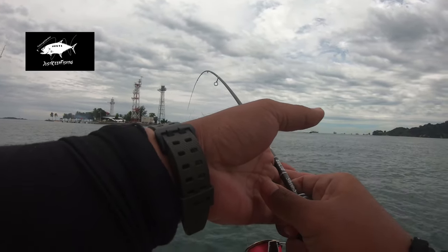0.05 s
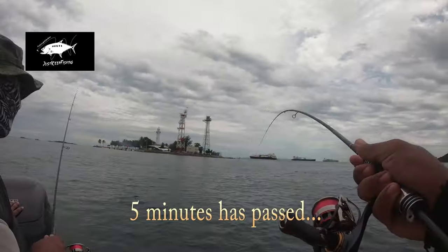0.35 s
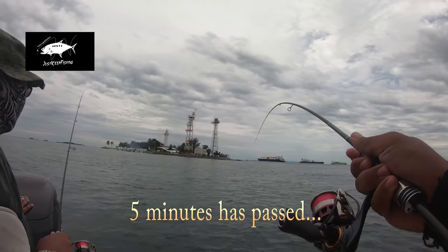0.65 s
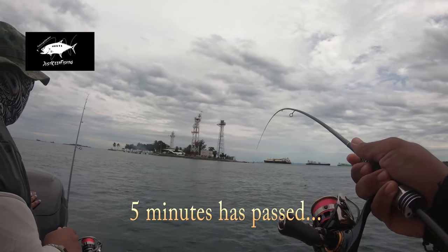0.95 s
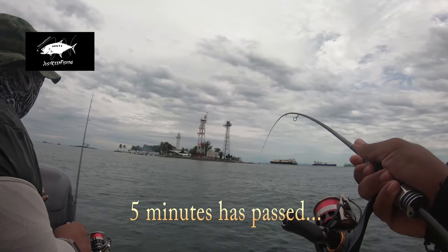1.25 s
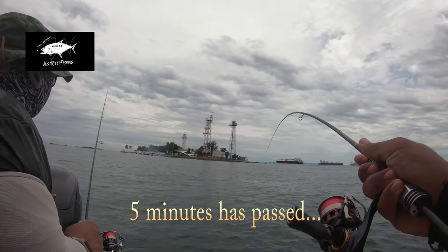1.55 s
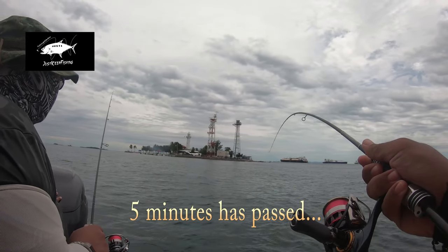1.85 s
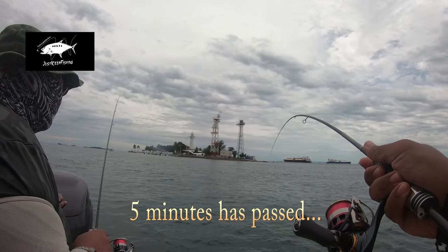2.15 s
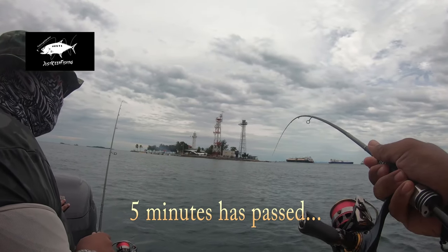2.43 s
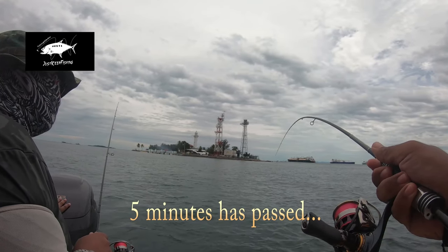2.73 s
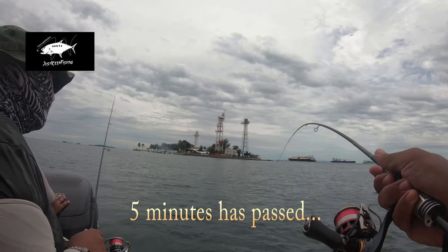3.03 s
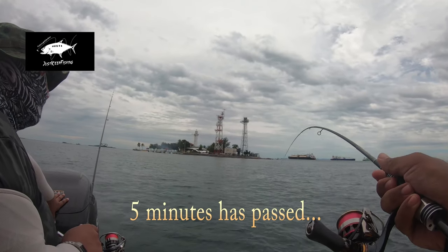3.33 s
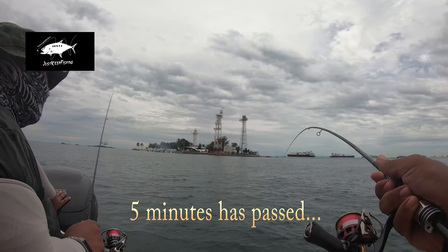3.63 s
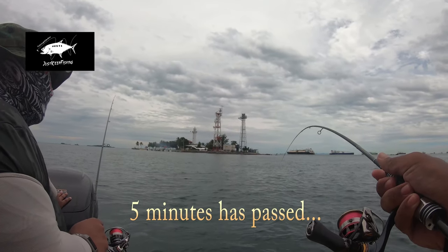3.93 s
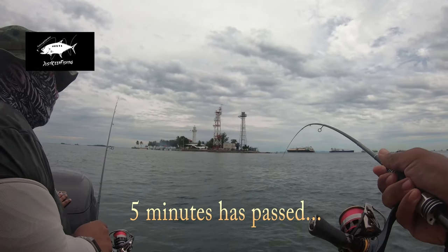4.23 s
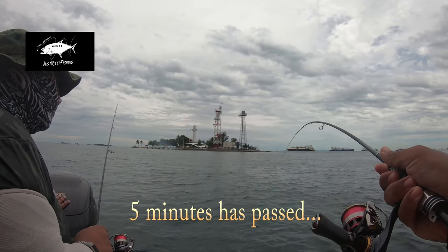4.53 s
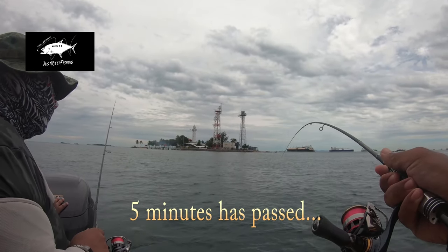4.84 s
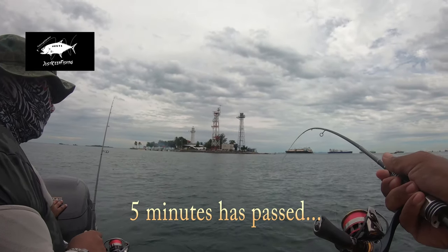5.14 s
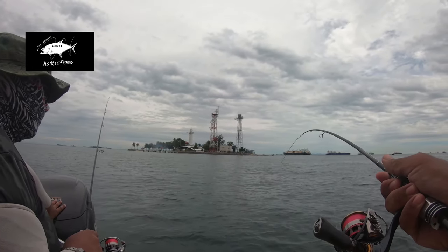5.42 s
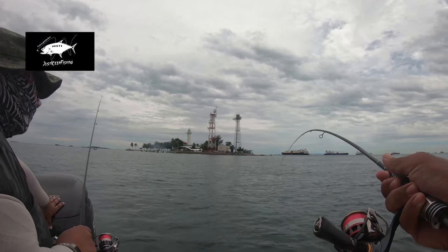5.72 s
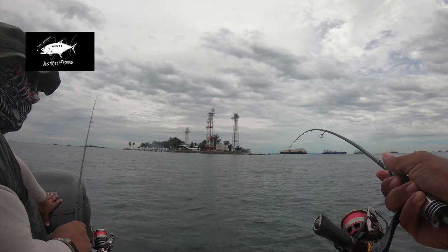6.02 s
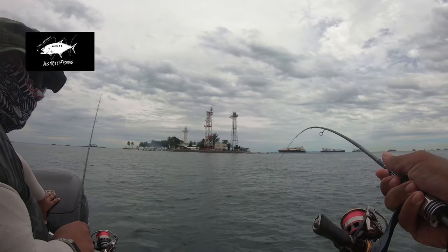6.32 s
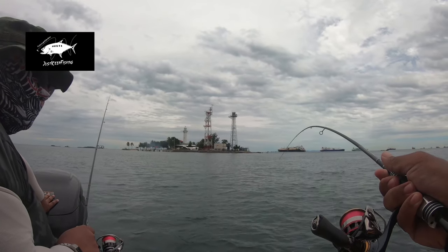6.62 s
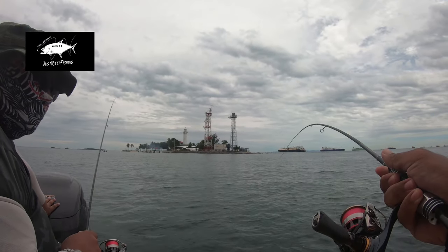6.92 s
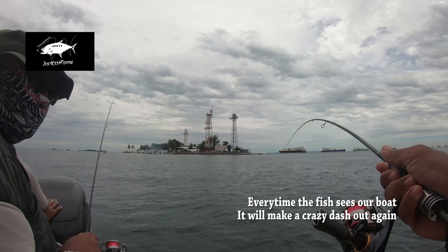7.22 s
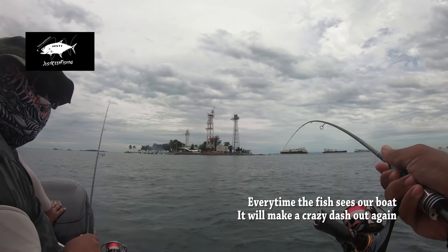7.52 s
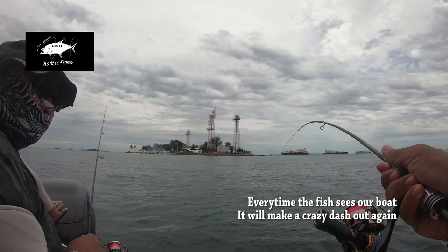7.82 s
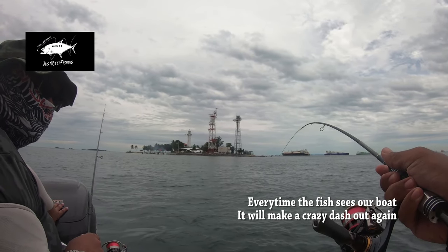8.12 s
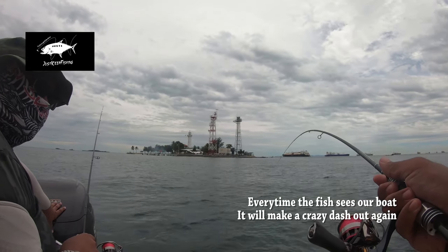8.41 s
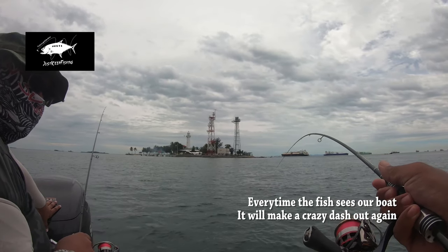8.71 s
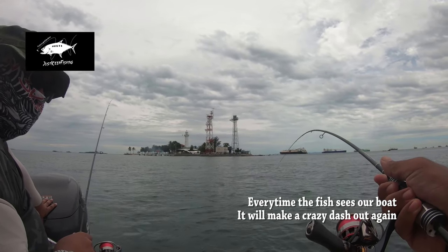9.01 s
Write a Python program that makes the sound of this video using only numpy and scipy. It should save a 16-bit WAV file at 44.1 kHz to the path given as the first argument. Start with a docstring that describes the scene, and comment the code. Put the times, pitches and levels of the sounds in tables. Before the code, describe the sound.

A fishing reel's drag ticks in metallic surges over an idling boat engine, wind gusts on the microphone and small waves.

```python
"""A fishing reel's drag ticks in surges over an idling boat engine, wind and small waves.
A sleeve swishes, then a fish pulls line: it hisses through the rod's rings and turns the spool,
and a pawl snaps over each ratchet tooth, ringing the metal. The engine hums through the hull,
gusts rumble on the microphone and bubbles plop against the side."""
import sys
import numpy as np
from scipy.fft import rfft, irfft, next_fast_len
from scipy.io import wavfile
from scipy.ndimage import map_coordinates

SR = 44100
rng = np.random.default_rng(int(sys.argv[2]) if len(sys.argv) > 2 else 0)


def master_out(mix):
    """Clip the mix to full scale and print it as 16-bit PCM to the path in sys.argv[1]."""
    frames = np.transpose(np.atleast_2d(mix))
    ceiling = np.clip(frames, -1, 1)
    pcm = np.round(ceiling * 32767).astype(np.int16)
    wavfile.write(sys.argv[1], SR, pcm)


N = 399546

# Noise spectra. Each row: frequency in Hz, relative density in dB.
HULL_SPECTRUM = [(8, -32), (18, -6), (30, -13.5), (48, 5), (70, -5), (105, -0.5), (140, -8), (190, -6.5),
                 (230, -33), (600, -34), (2000, -100)]
WASH_SPECTRUM = [(400, 13), (1400, 1), (2100, 2), (2900, 1), (3600, -2.5), (4500, -4), (6000, -14.5),
                 (8000, -18.5), (11000, -38), (15700, -53)]
DRONE_SPECTRUM = [(80, 3.5), (160, -3), (230, 4), (310, 0), (360, 4), (410, -0.5), (490, 1), (570, -3),
                  (660, -7), (820, -12.5), (1100, -27), (2500, -64)]
CLATTER_SPECTRUM = [(500, -13), (800, -2.5), (1000, 4.5), (1170, 7), (1290, 1.5), (1420, -2.5), (1600, -28),
                    (4000, -57)]
BUFFET_SPECTRUM = [(8, -20), (18, -4.5), (45, 5.5), (70, 8), (110, -2), (170, -7), (260, -31), (600, -76),
                   (2000, -100)]
BLUSTER_SPECTRUM = [(40, -5), (130, -3.5), (240, -3.5), (350, -19), (650, -17), (1100, -50), (3000, -72)]
RUB_SPECTRUM = [(300, -5), (900, -1), (1700, -1.5), (2300, -9), (3100, -10), (4800, -17), (7000, -17.5),
                (10500, -17), (13000, -31), (15700, -45)]
SWISH_SPECTRUM = [(1500, -29), (2400, -11), (3100, -7), (3700, -22), (5000, -23), (8000, -35)]
ZING_SPECTRUM = [(7400, -55), (7800, -5), (8100, 0), (8400, -28), (12200, -40), (12750, -13), (13300, -40)]
CRACK_SPECTRUM = [(1500, -30), (3000, -13), (3700, -4.5), (4600, -9.5), (5700, -3), (7000, -2), (8400, -4),
                  (10000, 2), (11300, -19), (12500, -20.5), (14100, -16.5), (15700, -32)]
# Stereo likeness of noise. Each row: frequency in Hz, left-right correlation from 0 to 1.
CORRELATION = [(30, 0.8), (70, 0.66), (130, 0.93), (300, 1), (500, 0.96), (800, 0.54), (1200, 0.39),
               (2200, 0.5), (5000, 0.52), (12000, 0.27)]
# Water wash. Each row: time in seconds, level in dB.
WASH_LEVEL = [(0.5, -49.5), (1.2, -48.5), (2.9, -46.5), (3.9, -46), (4.6, -48.5), (6.6, -45), (8.4, -45),
              (9.06, -44.5)]
# Bubbles at the hull. Each row: start in seconds, level in dB, starting pitch in Hz, t60 in seconds.
PLOPS = [(0.174, -33, 1720, 0.025), (2.2, -42, 2000, .06), (2.384, -30, 1107, 0.041),
         (2.5, -24, 1366, 0.053), (2.502, -34, 930, 0.057), (3.379, -42, 1820, .04),
         (3.485, -26.5, 514, 0.12), (3.492, -31, 1150, 0.027), (3.493, -26, 780, 0.041),
         (3.51, -29, 632, 0.11), (3.563, -41, 1430, .06), (3.589, -35, 3250, 0.02),
         (3.606, -28, 3260, 0.014), (3.61, -43, 1550, 0.063), (4.073, -32, 1810, 0.025),
         (4.089, -38, 1640, 0.055), (4.789, -45, 1590, .04), (6.235, -33, 1520, .025),
         (7.925, -34, 736, .06), (8.018, -31, 1290, 0.023), (8.107, -38, 2670, 0.028),
         (8.613, -37, 2140, 0.032), (8.808, -36, 2920, 0.034), (8.956, -33, 3120, 0.028),
         (8.957, -37, 2220, 0.033)]
# Engine lines. Each row: multiple of the shaft speed, level in dB.
SHAFT_ORDERS = [(15, -50.5), (16, -40), (19, -49), (20, -51), (30, -57), (32, -65.5), (33, -61), (35, -51),
                (42, -58), (47, -65), (57, -67), (59, -62), (97, -69.5)]
# Engine auxiliaries. Each row: frequency in Hz, level in dB.
AUXILIARY_TONES = [(85.5, -34.5), (106.3, -40), (179, -45), (285.3, -50.5), (425.3, -53), (565.9, -47),
                   (641.5, -59), (785, -66), (940.1, -62.5), (998, -62.5), (1953, -71)]
# Main hum. Each row: harmonic number, level in dB, its detuned twin's relative level in dB.
HUM_PARTIALS = [(1, -31.5, -5.5), (2, -46.5, -3.5)]
# High engine whine. Each row: time in seconds, level in dB.
WHINE_LEVEL = [(0, -60.5), (3.8, -63), (4.6, -56.5), (5.8, -62), (6.7, -51), (7.8, -53.5), (9.06, -60)]
# Gusts. Each row: peak time in seconds, level in dB, length in seconds, left minus right in dB.
GUSTS = [(0.01, -29, 0.27, -24), (0.174, -17, 0.27, 3.5), (0.316, -23, 0.6, -7), (1.12, -30.5, 0.6, -2),
         (1.38, -27, 0.32, -3), (1.644, -17, 0.12, 8), (1.67, -13, 0.24, -10.5), (1.786, -19, 0.092, -4),
         (2.15, -23.5, 0.25, -2), (2.34, -22, 0.58, -4), (2.623, -20, 0.13, -8), (3.073, -26, 0.21, -5),
         (4.61, -32, 0.26, -6), (4.885, -30, 0.29, 0), (5.513, -26, 0.43, 6), (7.574, -32, 0.5, -9),
         (8.17, -30, 0.35, 3)]
# Sleeve strokes. Each row: peak time in seconds, rub and swish in dB, rise, hold and fall in seconds.
SLEEVE_STROKES = [(0.01, -33, -45, 0.17, 0.038, 0.1), (0.256, -44, -48, 0.045, 0.037, 0.055),
                  (0.523, -48, -64, 0.18, 0.084, 0.2)]
# Spool speed as the fish surges and tires. Each row: time in seconds, nominal teeth per second.
SPOOL_SPEED = [(0.4, 70), (0.68, 53), (0.78, 36), (0.92, 41), (1.13, 13), (1.38, 55), (1.48, 33),
               (1.86, 72), (1.93, 48), (2.24, 70), (2.35, 51), (2.62, 90), (3.1, 98), (3.2, 70), (3.39, 54),
               (3.47, 78), (3.72, 55), (3.95, 85), (4.2, 57), (4.33, 77), (4.54, 70), (4.82, 90),
               (5.06, 47), (5.22, 52), (5.56, 25), (5.83, 52), (5.97, 15), (6.18, 42), (6.37, 24),
               (6.57, 50), (6.88, 54), (7.08, 82), (7.44, 37), (7.58, 43), (7.77, 9), (7.96, 33),
               (8.15, 30), (8.25, 14), (8.43, 42), (8.65, 39), (8.77, 91), (9.06, 100)]
# Strength of the pawl's snap. Each row: time in seconds, gain in dB.
SNAP_STRENGTH = [(0.4, -5.5), (1.3, -3), (2.8, -1.8), (4.9, -2.46), (6, -1.9), (8, -2.9), (9.06, -0.5)]
# Ticks before the run. Each row: start in seconds, gain in dB.
LONE_TICKS = [(0.15, 0.5), (0.399, -15)]
# Spool ring. Each row: frequency in Hz, gain in dB, t60 in seconds, leftward bias in dB.
SPOOL_MODES = [(2715, -17.5, 0.061, -5), (3100, -11.5, 0.016, -12), (3662, -6, 0.023, -6),
               (5737, -13.5, 0.042, -11.5), (6430, -12, 0.0062, -11), (7600, 0.5, 0.0094, 4.5),
               (8310, -5.5, 0.047, 3), (8477, -3, 0.035, 3), (9000, -2, 0.0077, 14), (9830, 0, 0.0086, -2),
               (11700, -19, 0.01, -4), (14100, -22, 0.0073, 0)]


def amp(db):
    """Decibels to gain."""
    return 10 ** (np.asarray(db) / 20)


def unit(x):
    """Scale to rms 1."""
    return x / np.sqrt(np.mean(x ** 2) + 1e-20)


def along(points, hz):
    """Interpolate (Hz, value) rows on a log axis."""
    knots_hz, values = np.transpose(points)
    return np.interp(np.log(hz + 1), np.log(knots_hz + 1), values)


def curve(rows):
    """Interpolate (seconds, value) rows at every sample."""
    return np.interp(np.arange(N) / SR, *np.transpose(rows))


def wobble(rate_hz, n=N):
    """Smooth random curve, rate_hz knots a second."""
    knots = rng.standard_normal(int(n * rate_hz / SR) + 4)
    return map_coordinates(knots, [np.arange(n) * rate_hz / SR])


def swell(peak_s, rise_s, fall_s, hold_s=0):
    """Gain that climbs to 1, holds and dies; 20 dB per rise or fall time."""
    t = np.arange(N) / SR - peak_s
    decades = np.maximum(-t / rise_s, 0) + np.maximum((t - hold_s) / fall_s, 0)
    return amp(-20 * np.minimum(decades, 10))


def filtered(x, response):
    """Apply a response given as a function of Hz."""
    size = next_fast_len(N + SR // 2)
    return irfft(rfft(x, size) * response(np.fft.rfftfreq(size, 1 / SR)), size)[..., :N]


def noise(spectrum, shape=N):
    """Shaped noise of rms 1, channels independent."""
    return unit(filtered(rng.standard_normal(shape), lambda hz: amp(along(spectrum, hz))))


def stereo_noise(spectrum):
    """Shaped noise of rms 1, near mono in the bass, wide in the treble."""
    def mid_side(hz):
        angle = np.arccos(np.clip(along(CORRELATION, hz), -1, 1)) / 2
        return amp(along(spectrum, hz)) * [np.cos(angle), np.sin(angle)]
    mid, side = filtered(rng.standard_normal((2, N)), mid_side)
    return unit(np.array([mid + side, mid - side]))


def pan(left_db):
    """Channel gains for a left minus right level."""
    return amp([[left_db / 2], [-left_db / 2]])


def left_lag(hz, lag_s):
    """Channel phases that put the left lag_s behind the right."""
    return np.exp(-1j * np.pi * hz * lag_s * np.array([[1], [-1]]))


def add(track, start_s, sound):
    """Mix a sound into a track."""
    start = max(round(start_s * SR), 0)
    track[..., start:start + sound.shape[-1]] += sound[..., :max(N - start, 0)]


def tone(cycles, flutter_db=3.0):
    """Sine of rms 1 with a fluttering level."""
    return unit(np.sin(2 * np.pi * (cycles + rng.random())) * amp(flutter_db * wobble(6)))


def hull(level_db=-26.5, rock_db=0.5):
    """Mono rumble of the hull, shaken by engine and water."""
    return amp(level_db + rock_db * wobble(5)) * noise(HULL_SPECTRUM)


def bubble(hz, t60_s, rise=0.062, churn=0.046, attack_s=0.0016):
    """Damped ring, shaken by churning water; the pitch rises as it nears the surface."""
    t = np.arange(SR // 5) / SR
    pitch_hz = hz * (1 + rise * np.minimum(t / t60_s, 1) + churn * wobble(SR / 64, len(t)))
    envelope = amp(-60 * t / t60_s) * (1 - np.exp(-t / attack_s))
    return envelope * np.sin(2 * np.pi * np.cumsum(pitch_hz) / SR)


def sea(ripple_db=0.7, spray_offset_db=-15.5, fizz_db=-59, fizz_count=220):
    """Soft wash with tiny bubbles and a few clear plops, each in a puff of spray."""
    wash = amp(curve(WASH_LEVEL) + ripple_db * wobble(15))
    bubbles, spray = np.zeros((2, N)), np.zeros(N)
    for start_s, db, hz, t60_s in PLOPS:
        add(bubbles, start_s, amp(db) * bubble(hz, t60_s) * pan(left_db=-8))
        puff = amp(db + spray_offset_db) * swell(start_s, rise_s=0.024, fall_s=0.03)
        spray = np.maximum(spray, puff)
    for when, pitch, strength, side in rng.random((fizz_count, 4)):
        hz = 900 * 2 ** (2 * pitch)
        fizz = amp(fizz_db + 15 * strength) * bubble(hz, t60_s=45 / hz)
        add(bubbles, when * N / SR, fizz * pan(left_db=-23 + 12 * side))
    return np.hypot(wash, spray) * stereo_noise(WASH_SPECTRUM) * pan(left_db=-1) + bubbles


def hum(clock_s, hz=159.2, beat_s=5.14, first_dip_s=1.745, flutter_db=0.5):
    """Two close engine tones beat slowly; their octaves beat twice as fast."""
    lead_cycles = (clock_s - first_dip_s) / beat_s
    out = np.zeros(N)
    for harmonic, db, twin_db in HUM_PARTIALS:
        cycles = harmonic * hz * clock_s + rng.random()
        main = np.sin(2 * np.pi * cycles)
        twin = amp(twin_db) * np.sin(2 * np.pi * (cycles + harmonic * lead_cycles))
        out += np.sqrt(2) * amp(db + flutter_db * wobble(3.2)) * (main - twin)
    return out


def engine(shaft_hz=12.515, whine_hz=1141.9, drone_db=-35, clatter_db=-50):
    """Shaft orders, hum and whines over hull drone and valve clatter that pulse with the firings."""
    clock_s = np.cumsum(1 + 0.001 * wobble(3)) / SR  # the idle hunts a little
    turns = shaft_hz * clock_s
    lines = sum(amp(db) * tone(order * turns) for order, db in SHAFT_ORDERS)
    lines += sum(amp(db) * tone(hz * clock_s) for hz, db in AUXILIARY_TONES)
    whine_db = curve(WHINE_LEVEL)
    whine = amp(whine_db) * tone(whine_hz * clock_s + 0.2 * wobble(50), flutter_db=2)
    firing = np.cos(2 * np.pi * 3 * turns)
    drone = amp(drone_db + 0.5 * wobble(2.906)) * stereo_noise(DRONE_SPECTRUM) * (1 + 0.12 * firing)
    follow_db = 0.34 * (whine_db - whine_db.mean())  # clatter grows with the whine
    clatter = amp(clatter_db + follow_db) * stereo_noise(CLATTER_SPECTRUM) * (1 + 0.19 * firing)
    tones = lines + hum(clock_s) + whine
    return tones * pan(left_db=-0.5) + drone * pan(left_db=-1.36) + clatter * pan(left_db=-3.5)


def wind(breeze_db=-41.5, swing_db=2, bluster_db=-18, overload_db=-8):
    """Eddies buffet each microphone port; strong gusts reach higher in pitch and overload it softly."""
    power = amp(breeze_db + swing_db * wobble(5)) ** 2 * np.ones((2, 1))
    for peak_s, db, length_s, left_db in GUSTS:
        power += (amp(db) * swell(peak_s, length_s / 2, length_s / 2) * pan(left_db)) ** 2
    force = np.sqrt(power)
    buffet = force * noise(BUFFET_SPECTRUM, (2, N))
    bluster = amp(bluster_db) * (force / force.max()) ** 1.37 * noise(BLUSTER_SPECTRUM, (2, N))
    return amp(overload_db) * np.tanh((buffet + bluster) / amp(overload_db))


def sleeve(grain_db=1.0):
    """Cloth rubs in grainy strokes; its weave adds a narrow swish."""
    rub, swish = stereo_noise(RUB_SPECTRUM), stereo_noise(SWISH_SPECTRUM)
    strokes = np.zeros((2, N))
    for peak_s, rub_db, swish_db, rise_s, hold_s, fall_s in SLEEVE_STROKES:
        strokes += swell(peak_s, rise_s, fall_s, hold_s) * (amp(rub_db) * rub + amp(swish_db) * swish)
    return strokes * amp(-grain_db * wobble(249))


def tooth_rate_hz():
    """Nominal teeth per second; zero before the run."""
    return curve(SPOOL_SPEED) * (np.arange(N) / SR > SPOOL_SPEED[0][0])


def line_hiss(hiss_db=-52, grain_db=7, zing_db=-57):
    """Taut line scrapes through the rod's rings, louder with speed and pull, and sings as it starts."""
    rate_hz = tooth_rate_hz()
    gain = amp(hiss_db + curve(SNAP_STRENGTH)) * (rate_hz / rate_hz.max()) ** 0.91
    scrape = gain * unit(stereo_noise(CRACK_SPECTRUM) * amp(grain_db * wobble(700)))
    zing = amp(zing_db) * swell(peak_s=0.4, rise_s=0.007, fall_s=0.13, hold_s=0.17)
    return scrape + zing * stereo_noise(ZING_SPECTRUM)


def pawl_snaps(slip_hz=14, slip_depth=0.045, tug_db=0.5, scatter_db=1.5):
    """(seconds, dB) per tooth. The drag washers grip and give; each slip is quicker and louder."""
    tug = wobble(slip_hz)
    teeth_passed = np.cumsum(tooth_rate_hz() * np.exp(slip_depth * tug)) / SR
    snaps = np.flatnonzero(np.diff(np.floor(teeth_passed)))
    gain_db = curve(SNAP_STRENGTH)[snaps] + tug_db * tug[snaps]
    gain_db += scatter_db * rng.standard_normal(len(snaps))
    return [*LONE_TICKS, *zip(snaps / SR, gain_db)]


def reel(ring_db=-35.5, crack_db=-38, crack_t60_s=0.011, rattle_db=-47.5, rattle_t60_s=0.04,
         friction_db=-50, friction_s=0.00043, attack_s=0.00035, scatter_db=0.8, detune=0.01):
    """Each tooth scrapes under the pawl, which snaps: it cracks, rings the spool, rattles the body."""
    t = np.arange(SR // 40) / SR
    hz, mode_db, t60_s, left_db = np.transpose(SPOOL_MODES)[:, :, None]
    onset = 1 - np.exp(-(t / attack_s) ** 2)
    decays = amp(ring_db + mode_db - 60 * t / t60_s) * onset
    crack = amp(crack_db - 60 * t / crack_t60_s) * onset
    rattle = amp(rattle_db - 60 * t / rattle_t60_s) * onset
    friction = amp(friction_db) * np.exp(-t[::-1] / friction_s)  # grows until the pawl lets go
    placement = amp(np.array([[0.5], [-0.5]]) * left_db.T) * left_lag(hz.T, 40e-6)  # reel to the right
    ring, noise_gain = np.zeros((2, N)), np.zeros(N)
    for snap_s, db in pawl_snaps():
        strength, pitch = rng.standard_normal((2, *hz.shape))  # no two teeth strike alike
        modes = decays * amp(scatter_db * strength) * np.exp(2j * np.pi * hz * (1 + detune * pitch) * t)
        add(ring, snap_s, amp(db) * (placement @ modes).imag)
        add(noise_gain, snap_s - t[-1], amp(db) * friction)
        add(noise_gain, snap_s, amp(db) * (crack + rattle))
    return (ring + noise_gain * stereo_noise(CRACK_SPECTRUM)) * pan(left_db=-2.2)


def scene():
    """Stereo mix at the angler's seat."""
    boat = filtered(engine() + sea() + hull(), lambda hz: left_lag(hz, lag_s=18e-6))
    return boat + reel() + line_hiss() + wind() + sleeve()


def record(dry, cutoff_hz=15750):
    """Brick-wall low-pass."""
    return filtered(dry, lambda hz: hz < cutoff_hz)


dry = scene()
out = record(dry)
master_out(out)
```